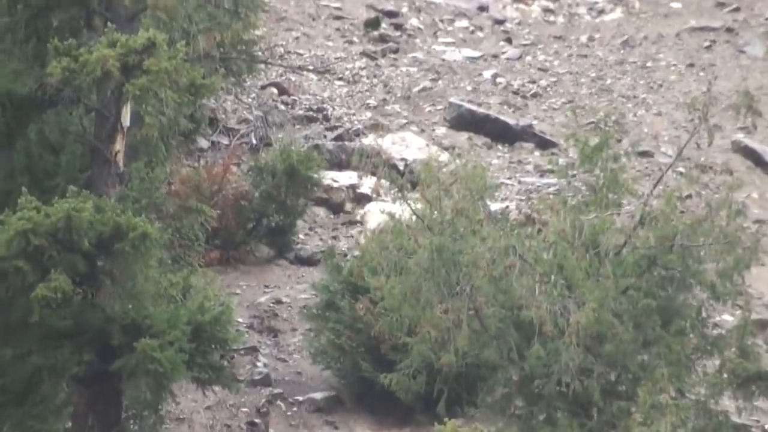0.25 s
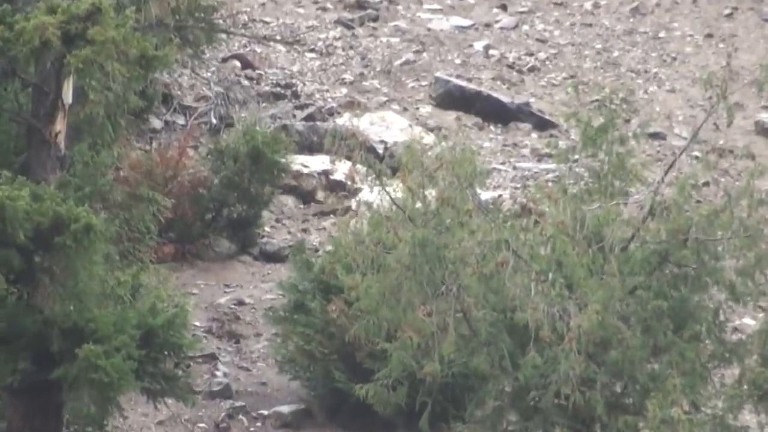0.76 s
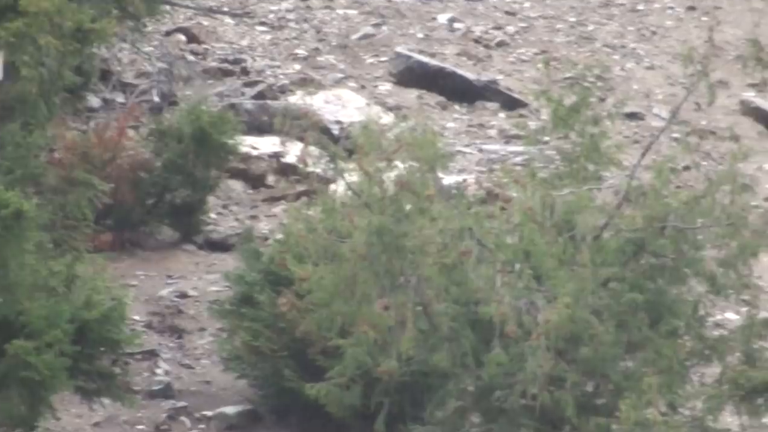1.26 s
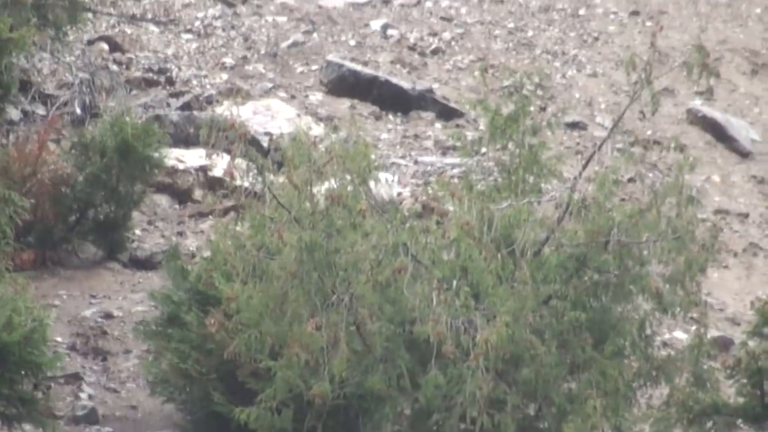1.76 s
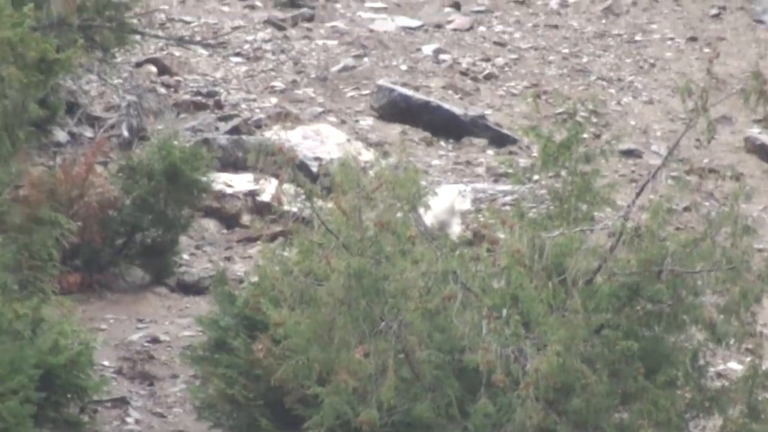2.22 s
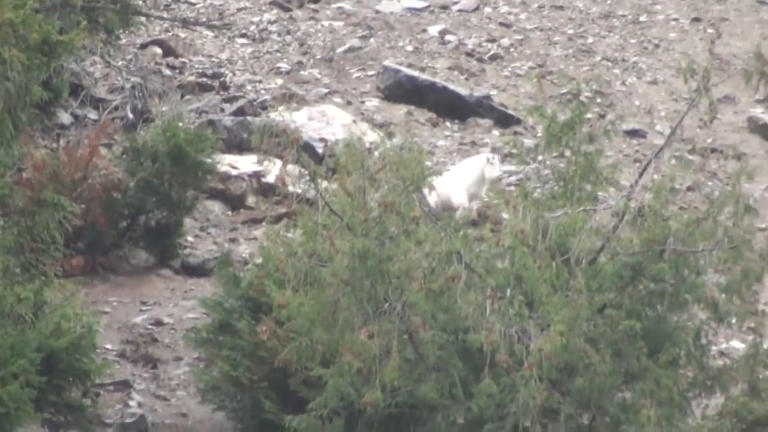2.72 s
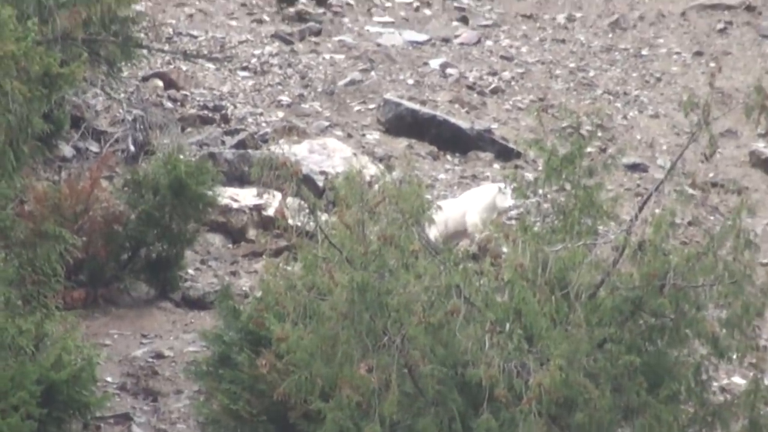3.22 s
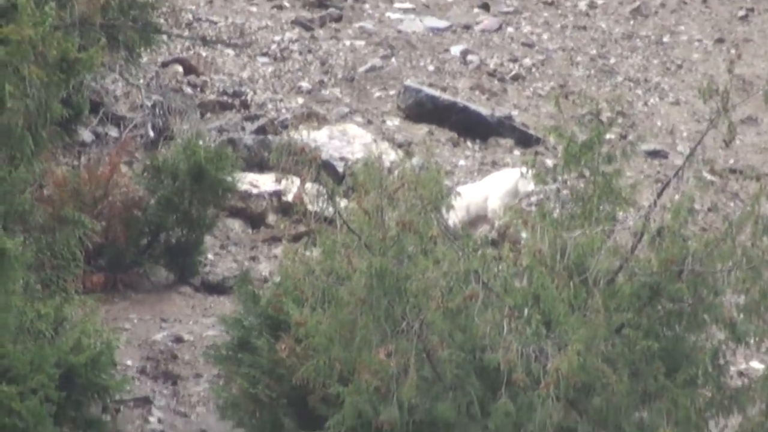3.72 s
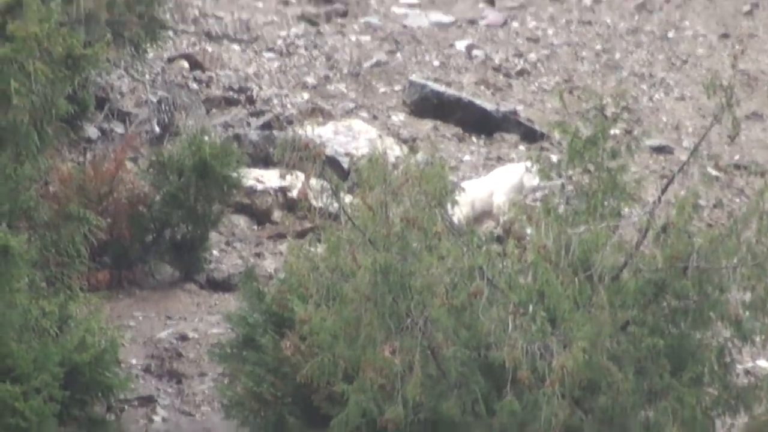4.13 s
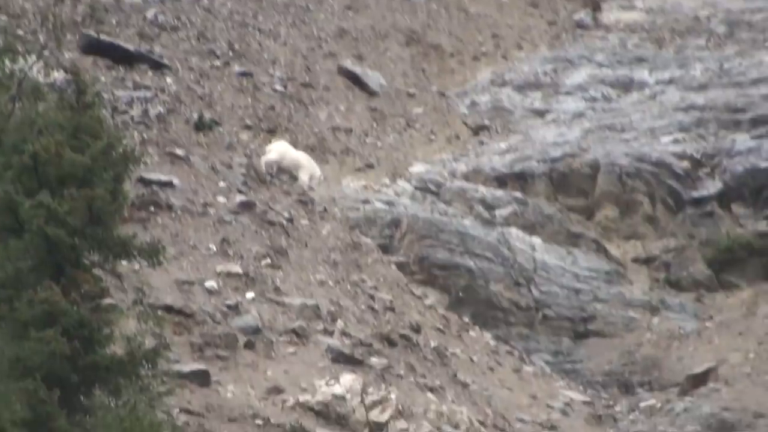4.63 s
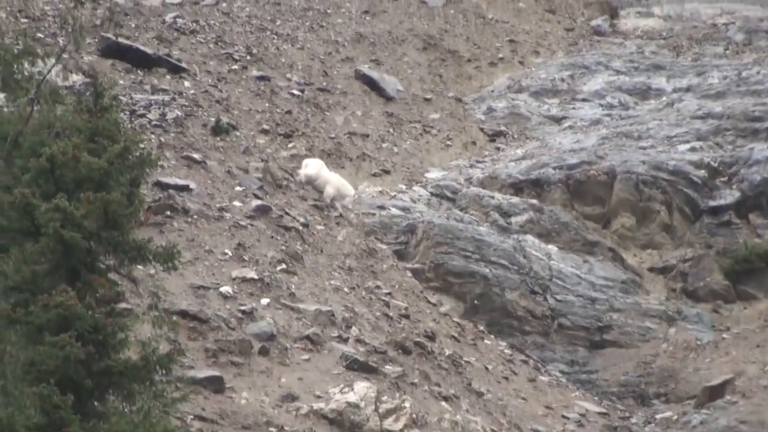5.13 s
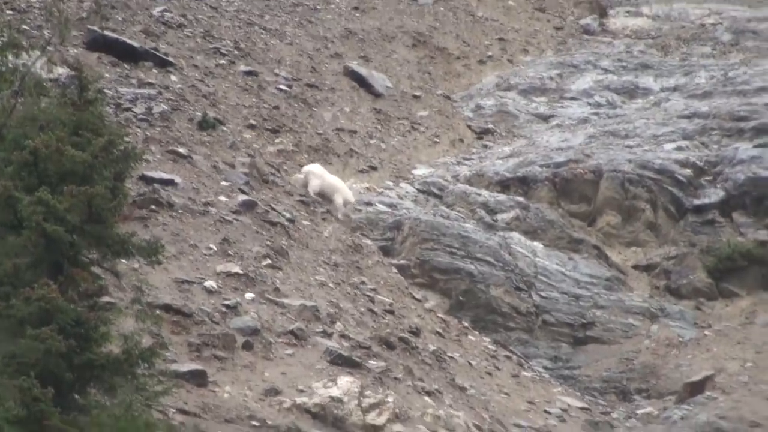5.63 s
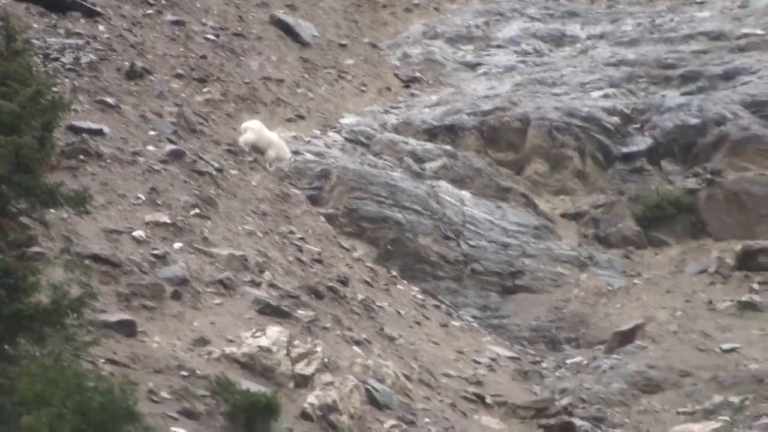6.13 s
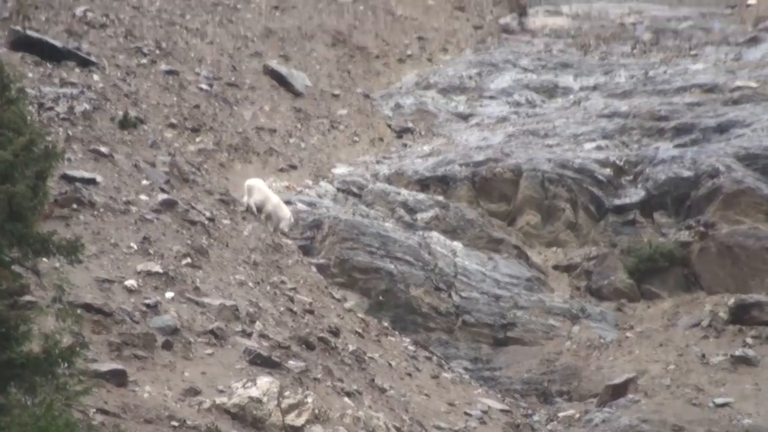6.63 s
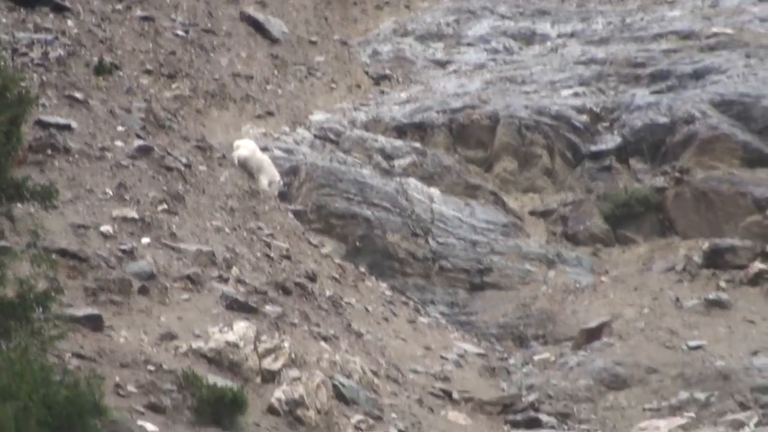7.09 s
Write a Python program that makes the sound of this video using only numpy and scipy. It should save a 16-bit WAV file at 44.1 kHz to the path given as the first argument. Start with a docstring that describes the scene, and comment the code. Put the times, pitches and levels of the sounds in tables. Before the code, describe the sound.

From 0 s, light rain patters quietly outdoors on leaves, twigs and stones: hundreds of tiny dry ticks in loose flurries, merging into a soft distant wash with a thin, steady high hiss. Low wind on the microphone rumbles at the start, then eases and returns in small gusts. Nearby drops stand out irregularly, a cluster around 0.5-1 s, a few at 1.6-2 s, and a sharper tick at 2.8 s. At about 4.5 s the rain and hiss abruptly step up, denser and closer, with frequent crisp ticks and splashes. Wind puffs near 5.5 s, and a strong bright tick lands at 5.6 s. At 6.0 s one drop hits the microphone itself: a very loud, short thump with a tiny plastic-like rattle, leaning right. Crackling rain continues, with low wind gusts at about 7.2 s and swelling at the end near 7.4 s. Reflections are short and faint.

```python
"""Light rain ticks on twigs, leaves and stones on a wooded mountainside; farther drops merge into patter and a wash.
Each drop is a dull thud, a short ring and a noise splash; randomly timed drops make the patter.
Echoes, noise bands and a thin hiss surround it, and gusty low noise is wind on the microphone.
At a cut at 4.46 s the patter, wash and hiss all jump 6 dB louder.
At 6 s one drop lands on the microphone housing as a thump and rattle."""
import sys
import numpy as np
from scipy import signal
from scipy.io import wavfile

SR = 44100
rng = np.random.default_rng(int(sys.argv[2]) if len(sys.argv) > 2 else 0)


def generate_wav(sig):
    """Save sig (samples, or channels by samples) to the path in sys.argv[1] as 16-bit PCM at SR."""
    pcm = np.round(np.clip(np.atleast_2d(sig).T, -1, 1) * 32767).astype(np.int16)
    wavfile.write(sys.argv[1], SR, pcm)


N = 324576

# The nearest drops: (time [s], pitch of the struck spot [Hz], ring level [dB], splash level [dB],
# left over right [dB])
NEAR_DROPS = [(0.253, 1730, -43, -57, 3), (0.4501, 1290, -44, -65, 2), (0.5474, 1620, -36.5, -61, 1),
              (0.6301, 1760, -36.5, -55, 1), (0.6995, 2550, -38, -59, -1), (0.7327, 3350, -34.5, -41, 7),
              (0.8937, 1430, -32.5, -42, -5), (0.9869, 2630, -38.5, -65, 7), (1.5616, 2360, -38.5, -44, -6),
              (1.596, 3900, -29, -49, -6), (1.7076, 1700, -34.5, -46, -2), (1.8062, 4070, -41.5, -62, 0),
              (1.98, 2180, -37.5, -52, -3), (2.4664, 2750, -38, -47, -2), (2.5026, 4215, -41, -41, 0),
              (2.8083, 2300, -24, -44, -1), (3.203, 2260, -33.5, -50, -5), (3.4075, 4070, -37.5, -43, -5),
              (3.4322, 2430, -29.5, -46, -2), (3.7968, 3102, -41, -44.5, -3), (3.9335, 1440, -38, -47, 12),
              (3.9559, 3860, -35, -43, -1), (3.9925, 4410, -40, -43, -3), (4.223, 2642, -42, -45, -1),
              (4.2877, 1964, -36, -60, -2), (4.4045, 1320, -34.5, -47, -4), (4.5717, 1300, -32, -34, -6),
              (4.6192, 1660, -31, -29.5, -9), (4.633, 2620, -35, -30.5, -4), (4.7206, 1600, -33, -41, -7),
              (4.7447, 3510, -33, -41, -7), (4.764, 2230, -28.5, -27, -6), (4.918, 3480, -32, -36, -6),
              (4.9642, 1780, -28, -41, -9), (5.1536, 1790, -27.5, -33, -7), (5.197, 3050, -42, -31.5, -1),
              (5.3867, 1360, -34, -34.5, -2), (5.4338, 1400, -26, -33, 9), (5.486, 2200, -30.5, -40.5, -6),
              (5.578, 2350, -15.5, -32, -2), (5.639, 4500, -31.5, -29.5, -4), (5.6634, 1350, -33, -46, -10),
              (5.679, 1340, -27, -34, -4), (6.0501, 4380, -33.5, -37, -5), (6.1952, 2390, -30, -39, -8),
              (6.2433, 4490, -51, -31.5, -4), (6.3136, 1870, -35, -37, -7), (6.4394, 4110, -32, -46, 1),
              (6.536, 2001, -30.5, -36, -10), (6.5781, 1608, -29, -39, -2),
              (6.5929, 4490, -32.5, -36.5, -7), (6.6359, 3880, -32.5, -34, -6), (6.7717, 1610, -28, -36, 5),
              (6.7812, 2900, -53, -30.5, 1), (6.9743, 1662, -25, -35, -6), (7.1296, 1927, -24, -32, -8.5),
              (7.24, 2210, -32, -36, 13), (7.2887, 1986, -31, -43, -3.5)]
THUD_FOLLOWS = 0.59   # dB of thud gained per dB of ring


def near_drops():
    """Single drops close by: a tick from a twig or stone, a duller pat from a leaf; low spots thud most."""
    typical_ring_db, thud_below_ring_db = -37.5, -4.5
    thud_pitch_hz, thud_db_per_octave = 1800, -6.5
    s, hz, ring_db, splash_db, pan_db = np.transpose(NEAR_DROPS)
    thud_db = typical_ring_db + thud_below_ring_db + THUD_FOLLOWS * (ring_db - typical_ring_db)
    thud_db = thud_db + thud_db_per_octave * np.log2(hz / thud_pitch_hz)
    rows = np.column_stack([s, hz, thud_db, ring_db, splash_db, pan_db])
    return impacts(rows, ring_cycles=0.3, springy_per_db=0.83, thud_hz=964, splash_hz=5010,
                   splash_width_hz=2470, splash_s=0.00028, bounce_db=-6)


def droplets(flight_s, softer_db, count=3):
    """Each near splash throws off a few droplets that land a moment later, softer and higher in pitch."""
    s, hz, ring_db, splash_db, pan_db = np.repeat(NEAR_DROPS, count, axis=0).T
    delay, smallness = rng.exponential(1, (len(s), 2)).T
    landing_s = s + flight_s * (0.284 + delay)
    pitch_hz = np.minimum(hz * from_db(2 * smallness), 5000)
    level_db = np.minimum(splash_db, ring_db) + softer_db - 2 * smallness
    rows = np.column_stack([landing_s, pitch_hz, level_db, level_db - 5, level_db, pan_db / 2])
    return impacts(rows, ring_cycles=0.74, springy_per_db=4.0, thud_hz=1040, splash_hz=5670,
                   splash_width_hz=2300, splash_s=0.00026, bounce_db=-30)


def patter(per_s, ring_breadth, clump_db, pitch_hz, pitch_spread, thud_db, splash_db, variety_db, pan_spread_db):
    """Drops fall in small flurries over a ring of ground: few are close and loud, many far and faint."""
    inner_edge_db = -41.5   # ring level of a drop at the inner edge, before the cut
    close_radii = 2.2       # within this distance drops still arrive as separate dry ticks
    time = np.arange(N) / SR
    drops_per_s = per_s * from_db(2 * shower(time) + clump_db * drift(25))
    s = time[rng.random(N) < drops_per_s / SR]
    # in radii of the inner edge, spread evenly over the ground
    distance = np.sqrt(1 + rng.random(len(s)) * ring_breadth ** 2)
    pitch, weight, wetness, side = np.clip(rng.standard_normal((len(s), 4)).T, -1.8, 1.8)
    loss_db = -20 * np.log10(distance)
    ring_db = inner_edge_db + loss_db
    rows = np.column_stack([
        s,
        pitch_hz * np.exp(pitch_spread * pitch),
        inner_edge_db + thud_db + THUD_FOLLOWS * loss_db + variety_db * weight,
        ring_db,
        ring_db + splash_db + variety_db * wetness,
        pan_spread_db * side - 0.5])
    close = distance <= max(close_radii, distance.min())
    ticks = impacts(rows[close], ring_cycles=0.52, springy_per_db=1.1, thud_hz=717, splash_hz=5580,
                    splash_width_hz=1800, splash_s=0.00035, bounce_db=-8.5)
    far = impacts(rows[~close], ring_cycles=1.0, springy_per_db=0.5, thud_hz=714, splash_hz=5430,
                  splash_width_hz=1750, splash_s=0.00039, bounce_db=-5.5)
    return np.array([ticks, far])


def shower(time):
    """How thickly the rain falls, in dB: it thickens around the near drops and thins between them."""
    # The shower eases slowly and picks up again: (time [s], level [dB])
    trend = [(0, 2), (1.1, 0), (4.4, -.5), (7.36, .5)]
    flurry_s, flurry_db, lull_db = 0.065, 3, -1.53
    grid = time[::200]
    crowd = np.exp(-((grid - np.array(NEAR_DROPS)[:, :1]) / flurry_s) ** 2).sum(axis=0)
    return in_time(trend, time) + lull_db + flurry_db * np.interp(time, grid, np.sqrt(crowd))


def impacts(rows, ring_cycles, springy_per_db, thud_hz, splash_hz, splash_width_hz, splash_s, bounce_db,
            size=300):
    """Each drop thuds dully, briefly rings the struck spot and bursts in a splash."""
    s, hz, thud_db, ring_db, splash_db, pan_db = np.transpose(rows)[:, :, None]
    heft, fineness, *paths = np.clip(rng.standard_normal((len(s), 4)), -2, 2).T[:, :, None]
    age = np.arange(size) / SR

    low_hz = thud_hz * from_db(3.35 * heft)
    thud = np.sin(2 * np.pi * low_hz * age) * np.exp(-(0.99 * low_hz * age) ** 2) * np.sqrt(age)

    # a springy spot rings longer and thuds less than a soft one
    cycles = ring_cycles * from_db(springy_per_db * np.clip(ring_db - thud_db, 0, 20))
    ring = np.sin(2 * np.pi * hz * age) * np.exp(-hz * age / cycles) * (1 - np.exp(-hz * age / 0.05))
    ring = band(ring, 1100, 7800, order=1)

    # finer spray sounds higher: every splash has a colour of its own
    spray = band(rng.standard_normal((len(s), size)) * np.exp(-age / splash_s), 37, splash_width_hz)
    splash = spray * np.cos(2 * np.pi * splash_hz * from_db(1.3 * fineness) * age)

    sound = 0
    for part, level_db in ((thud, thud_db), (ring, ring_db), (splash, splash_db)):
        # level as rms over a millisecond
        rms = np.sqrt(np.sum(part ** 2, axis=1, keepdims=True) * 1000 / SR)
        sound = sound + from_db(level_db) * part / rms

    at = (np.abs(s) * SR).astype(int) + np.arange(size)
    out = []
    for gain, path in zip(panned(pan_db), paths):
        # one bounce off a surface close by, about a millisecond late
        lag = (0.001113 * from_db(4 * path) * SR).astype(int)
        samples = (sound * gain).ravel()
        direct = np.bincount(at.ravel(), samples, N)[:N]
        bounce = np.bincount((at + lag).ravel(), samples, N)[:N]
        out.append(direct + from_db(bounce_db) * bounce)
    return np.array(out)


def housing_drop(thump_lag_s, shell_lag_s):
    """One heavy push and rebound, while spray rattles the small shell; the right port gets it first."""
    # The drop on the housing: (thump pitch [Hz], thump level [dB], rattle level [dB], left over right [dB])
    hit = (1000, 0, -7, -8.5)
    # Ringing modes of the shell: (pitch [Hz], relative level [dB], time to fall 60 dB [s])
    modes = [(2412, -8.5, 0.0075), (3683, -6, 0.0047), (4400, -1.5, 0.0058), (6260, 11, 0.0011),
             (7480, 6.5, 0.0044), (8600, 1.5, 0.005), (9640, -11, 0.0082), (12000, -11, 0.0052)]
    hit_s = 6.0068
    hz, thump_db, rattle_db, pan_db = hit
    since = np.arange(N) / SR - hit_s
    swing = 2 * np.pi * hz * (since - [[thump_lag_s], [0]]) - np.pi
    thump = -swing * np.exp((1 - swing ** 2) / 2)
    age = np.maximum(since - [[shell_lag_s], [0]], 0)
    rattle = 0
    for k, (mode_hz, mode_db, t60_s) in enumerate(modes):
        envelope = from_db(mode_db - 60 * np.minimum(age / t60_s, 2))
        rattle = rattle + envelope * np.sin(2 * np.pi * mode_hz * age) * (-1) ** k
    thump = from_db(thump_db) * thump * panned(pan_db)[:, None]
    # the rattle is panned half as far
    return thump + from_db(rattle_db) * rattle * panned(pan_db / 2)[:, None]


def scatter(x, near_db, near_s, far_db, far_s, count=6, size=6000):
    """Ground and branches throw back a quick spray of reflections and a faint longer one."""
    age, out = np.arange(size) / SR, 0
    # each 5 ms slice takes one of a few echo patterns, different on each side
    pattern = np.repeat(rng.integers(0, count, N // 220 + 1), 220)[:N]
    for k in range(count):
        echo = 0
        for level_db, decay_s in ((near_db, near_s), (far_db, far_s)):
            tail = band(rng.standard_normal((2, size)), 510, 4300, order=1)
            tail = tail * np.exp(-age / decay_s) * (1 - np.exp(-age / 0.0014))
            echo = echo + from_db(level_db) * rms_one(tail) / np.sqrt(size)
        part = x.mean(axis=0) * (pattern == k)
        out = out + signal.oaconvolve([part], echo, axes=1)[:, :N]
    return out


def housing_glint(drops):
    """A small resonance of the housing adds the same narrow high glint to both sides of every tick."""
    return from_db(6.5) * band(drops.mean(axis=0), 11300, 11600)


def distant_wash():
    """Distant rain merges into a soft wash of flickering noise bands, a touch louder as the rain thickens."""
    # Colour of the wash: (frequency [Hz], relative level per Hz [dB])
    colour = [(150, -13.5), (300, -1), (500, -0.5), (850, 0.5), (1400, -2), (2200, -2), (4000, -8),
              (7000, -12.5), (10000, -11), (15000, -93.5)]
    wash = banded_noise(colour, patchy_db=1.5, flicker_rate=25, edges=np.geomspace(140, 17000, 15))
    return wash * from_db(-54 + 0.033 * shower(np.arange(N) / SR))


def thin_hiss():
    """A thin high hiss: one narrow band of noise, the same on both sides."""
    return from_db(-64) * rms_one(band(rng.standard_normal(N), 11780, 15800, order=8))


def wind(calm_db, deep_db, deep_share, buffet_db, buffet_share):
    """Large eddies rumble deep; the smaller ones that buffet the ports follow the gusts more closely."""
    # Strength of the wind on the microphone, gusts and lulls: (time [s], level [dB])
    gusts = [(0.0, -38.5), (0.12, -34), (0.52, -41), (0.64, -49), (1.48, -46.5), (1.6, -40.5),
             (1.88, -56.5), (2.28, -44.5), (2.48, -64.5), (2.6, -47.5), (3.24, -44.5), (3.4, -50),
             (4.44, -40.5), (4.52, -60.5), (4.8, -57.5), (5.0, -39), (5.32, -52), (5.48, -33.5),
             (5.64, -51), (6.0, -43), (6.12, -54), (6.4, -62), (6.48, -44.5), (7.0, -47.5), (7.16, -32.5),
             (7.24, -48), (7.36, -27.5)]
    # Colour of the rumble: (frequency [Hz], relative level per Hz [dB])
    colour = [(20, 2), (40, 3.5), (65, -2), (102, -0.5), (150, -7.5), (214, -14.5), (320, -21.5),
              (500, -45)]
    gust_db = in_time(gusts, np.arange(N) / SR) - calm_db
    deep = banded_noise(colour, patchy_db=0.5, flicker_rate=6.2, edges=np.geomspace(18, 72, num=5))
    buffet = banded_noise(colour, patchy_db=2.5, flicker_rate=14.3, edges=np.geomspace(72, 576, num=7))
    deep = from_db(deep_db + deep_share * gust_db) * deep
    buffet = from_db(buffet_db + buffet_share * gust_db) * buffet
    return from_db(calm_db) * (deep + buffet)


def banded_noise(spectrum, patchy_db, flicker_rate, edges):
    """Bands of stereo noise, each with its own level, flicker and left-right likeness; rms 1."""
    # Left-right likeness: (frequency [Hz], correlation [0-1])
    likeness = [(30, 1), (90, .4), (180, 0.42), (400, 0.68), (1400, 0.18), (7000, 0.27), (10000, 0.4),
                (13000, .95)]
    out, white = 0, rng.standard_normal((2, 2, N))
    for k, (low, high) in enumerate(zip(edges, edges[1:])):
        # neighbouring bands use different noise
        mid, side = band(white[k % 2], low, high)
        hz = np.sqrt(low * high)
        alike = np.clip(at_hz(likeness, hz), -1, 1)
        gain = from_db(at_hz(spectrum, hz) + patchy_db * drift(flicker_rate))
        stereo = np.sqrt(1 + alike) * mid + np.sqrt(1 - alike) * side * [[1], [-1]]
        out = out + gain * stereo
    return rms_one(out)


def drift(rate):
    """Slow random wander with spread 1: noise through a two-pole low-pass at rate Hz."""
    # worked out at every 40th sample
    r = np.exp(-80 * np.pi * rate / SR)
    slow = signal.lfilter([1], [1, -2 * r, r * r], rng.standard_normal(N // 40 + 2002))[2000:]
    return np.interp(np.arange(N) / 40, np.arange(len(slow)), rms_one(slow))


def from_db(db):
    """Decibels to gain."""
    return 10 ** (np.asarray(db) / 20)


def rms_one(x):
    """Scale to rms 1."""
    return x / np.sqrt(np.mean(x ** 2) + 1e-20)


def in_time(rows, s):
    """Read a curve at the times s."""
    return np.interp(s, *np.transpose(rows))


def at_hz(points, hz):
    """Read a spectrum on a log-frequency axis."""
    f, value = np.transpose(points)
    return np.interp(np.log(hz), np.log(f), value)


def band(x, low_hz, high_hz, order=2):
    """Causal Butterworth band-pass."""
    edges_hz = [low_hz, min(high_hz, .45 * SR)]
    return signal.sosfilt(signal.butter(order, edges_hz, "band", fs=SR, output="sos"), x)


def panned(pan_db):
    """Left and right gains whose mean is 1."""
    gains = from_db(np.array([pan_db, -pan_db]) / 2)
    return gains / gains.mean(axis=0)


def scene():
    """Near drops and patter over the wash of distant rain, wind and a thin high hiss."""
    # at a cut at 4.46 s the patter, wash and hiss all jump 6 dB louder
    cut_gain = from_db(6 * (np.arange(N) / SR > 4.461))
    near = near_drops() + droplets(flight_s=.004, softer_db=-10.0)
    ticks, far = cut_gain * patter(per_s=230, ring_breadth=5.2, clump_db=2, pitch_hz=1870, pitch_spread=0.46,
                                   thud_db=-7.5, splash_db=-9.0, variety_db=5.0, pan_spread_db=4.5)
    near = near + ticks
    # the nearer a drop, the drier it sounds
    echoes = scatter(far + from_db(-9) * near, near_db=-10.5, near_s=0.0022, far_db=-24.0, far_s=0.028)
    rain = near + far + echoes + housing_glint(near + far) + cut_gain * distant_wash()
    rain = rain + housing_drop(thump_lag_s=.00009, shell_lag_s=.000009)
    rumble = wind(calm_db=-46.5, deep_db=-3.5, deep_share=0.46, buffet_db=-2.0, buffet_share=0.91)
    return rain + rumble + cut_gain * thin_hiss()


def record(dry):
    """The highest peak overloads, rounded off below 0.78; a steep low-pass cuts the top above 15.9 kHz."""
    held = dry / (1 + (dry / .78) ** 6) ** (1 / 6)
    return signal.sosfilt(signal.ellip(10, .1, 80, 15900, fs=SR, output="sos"), held)


dry = scene()
out = record(dry)
generate_wav(out)
```